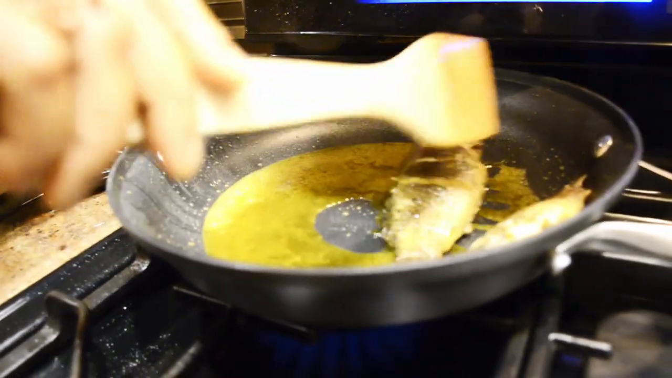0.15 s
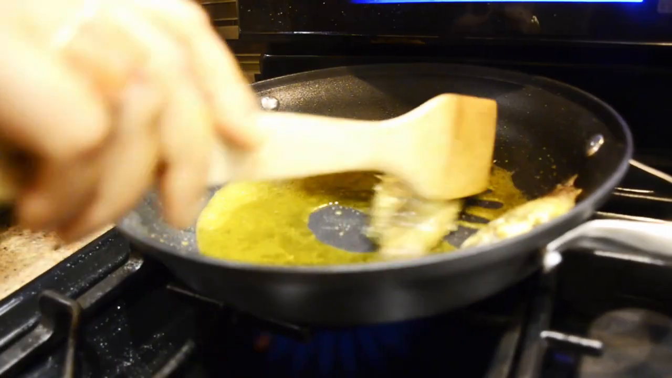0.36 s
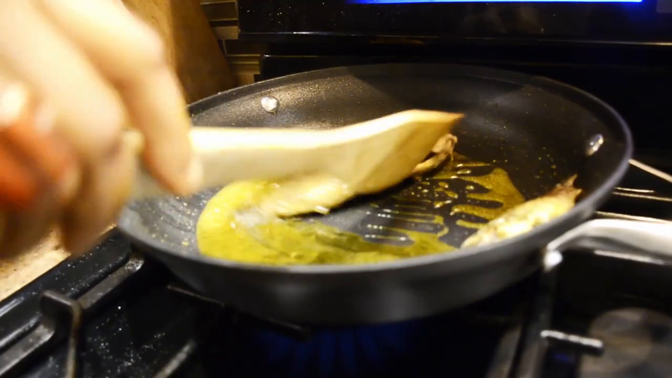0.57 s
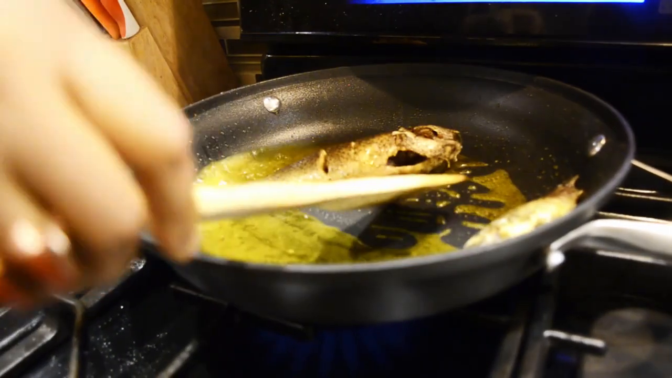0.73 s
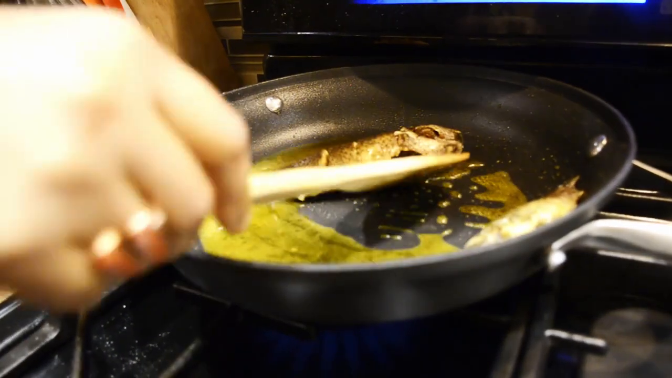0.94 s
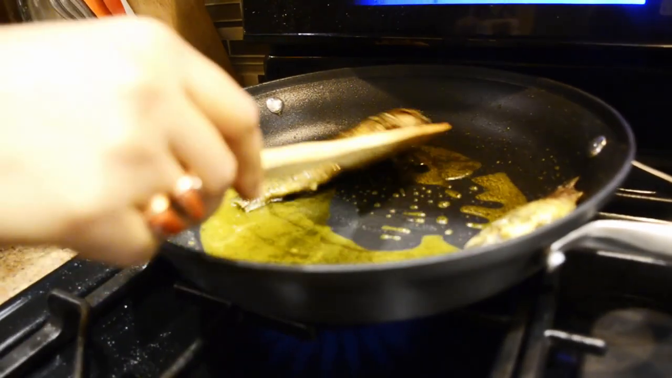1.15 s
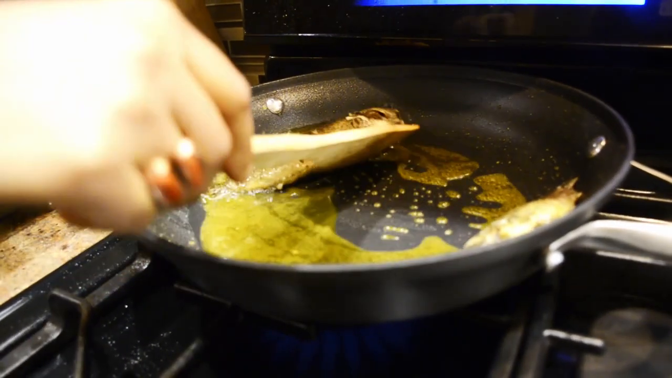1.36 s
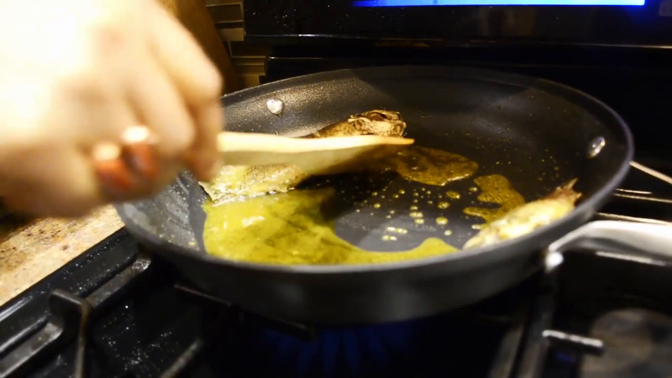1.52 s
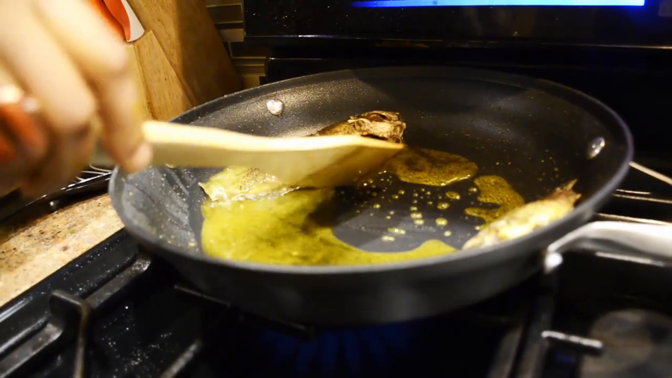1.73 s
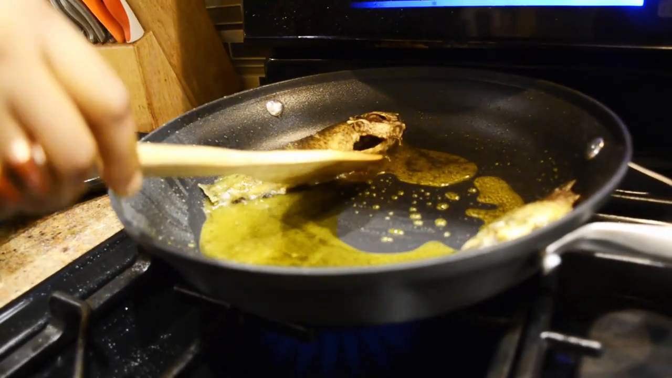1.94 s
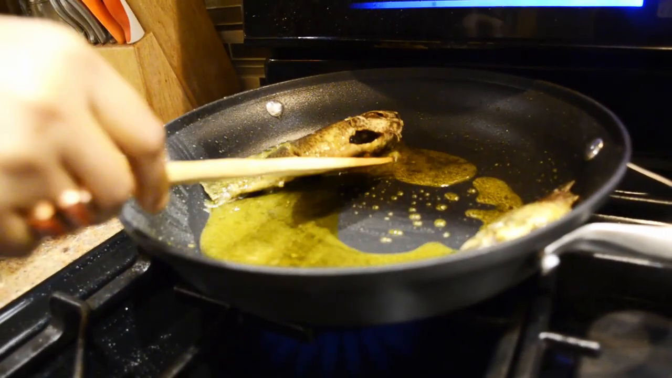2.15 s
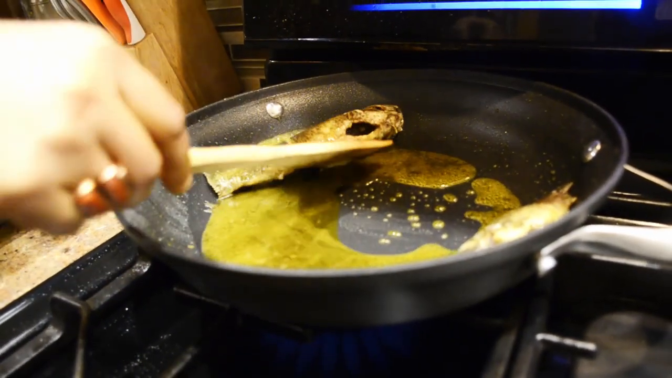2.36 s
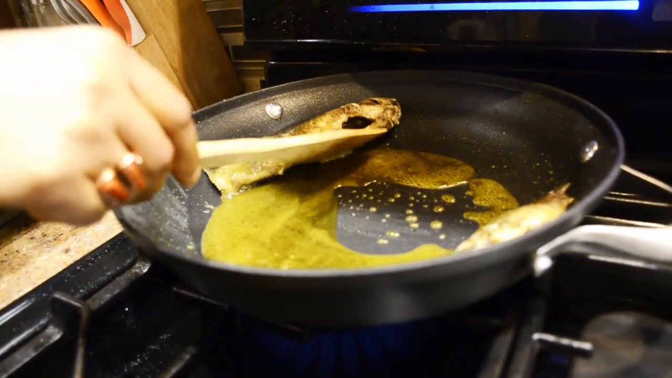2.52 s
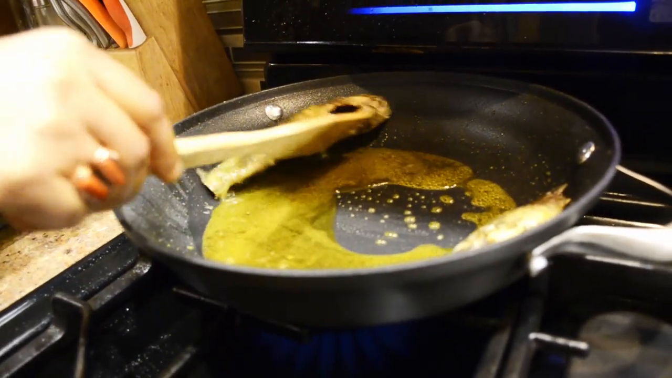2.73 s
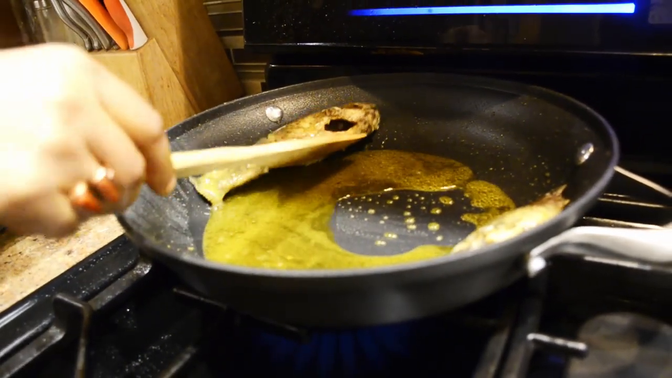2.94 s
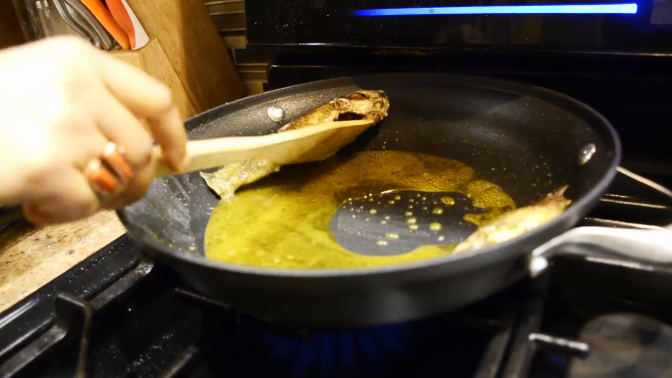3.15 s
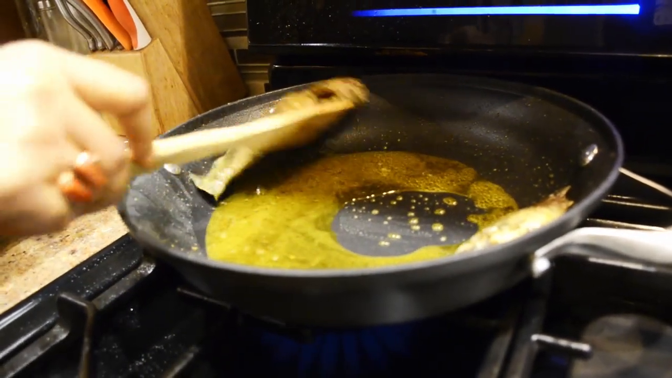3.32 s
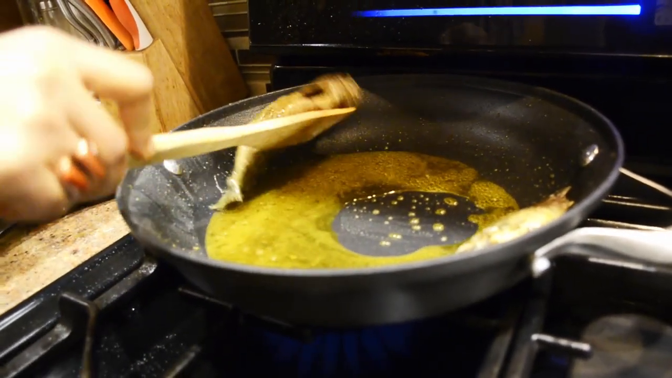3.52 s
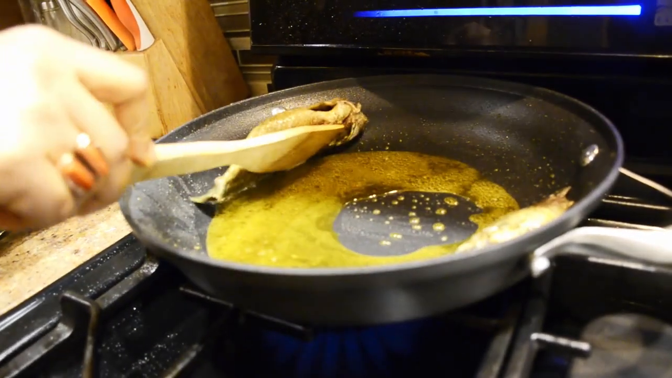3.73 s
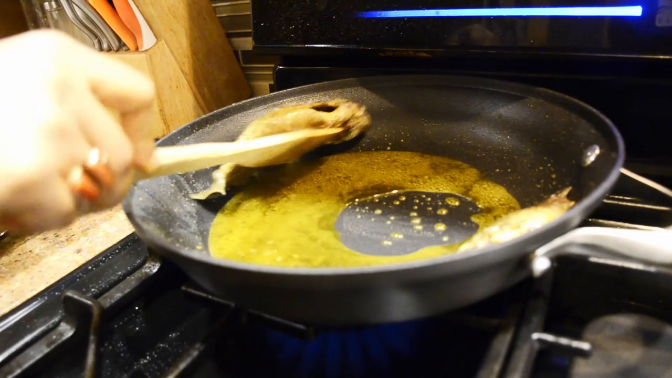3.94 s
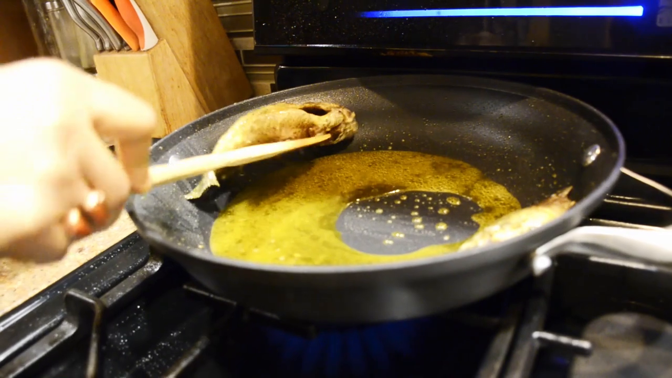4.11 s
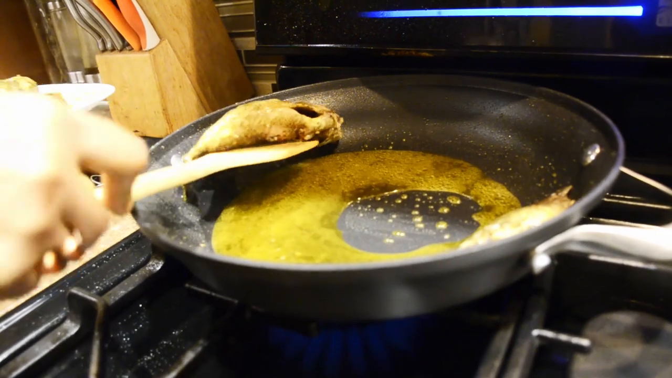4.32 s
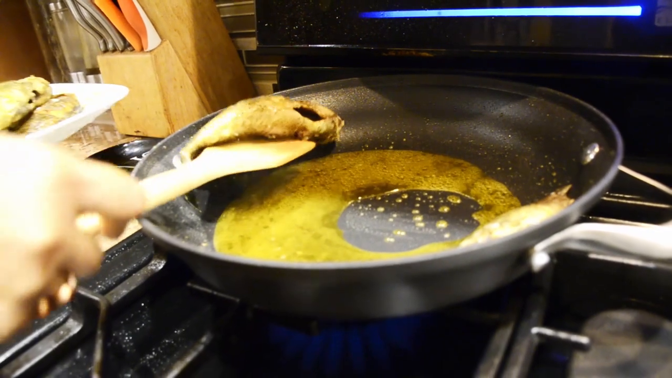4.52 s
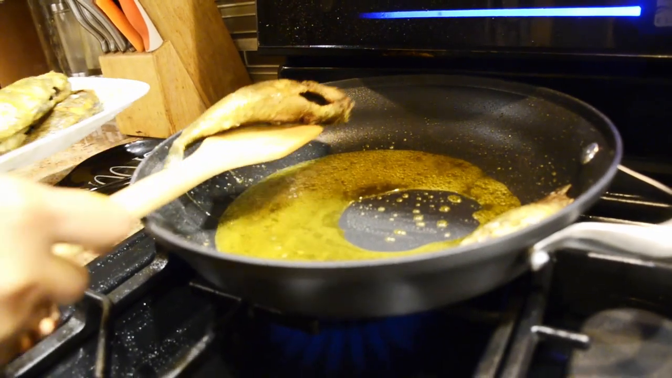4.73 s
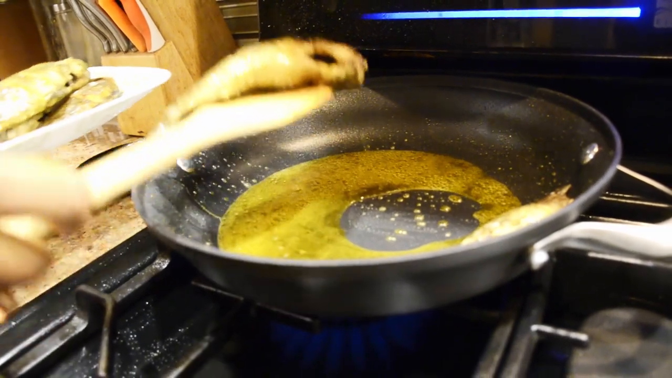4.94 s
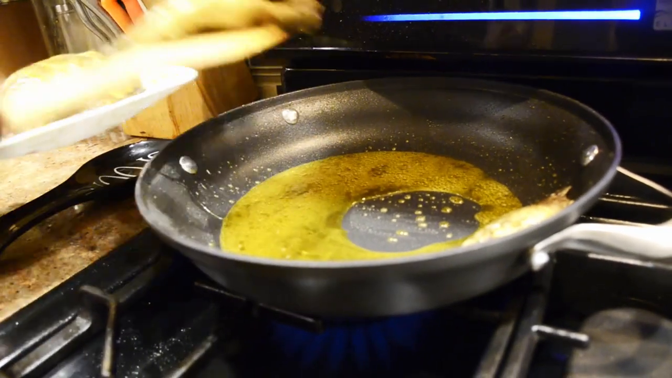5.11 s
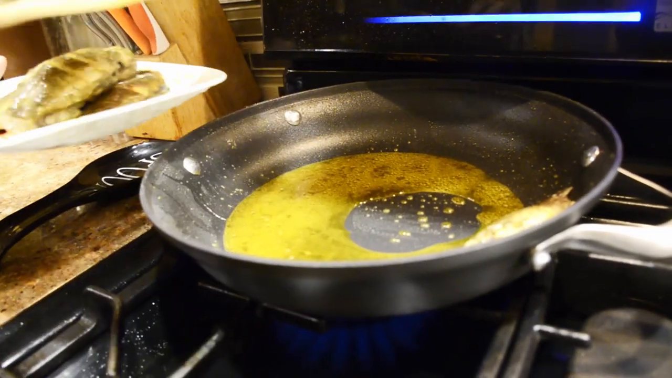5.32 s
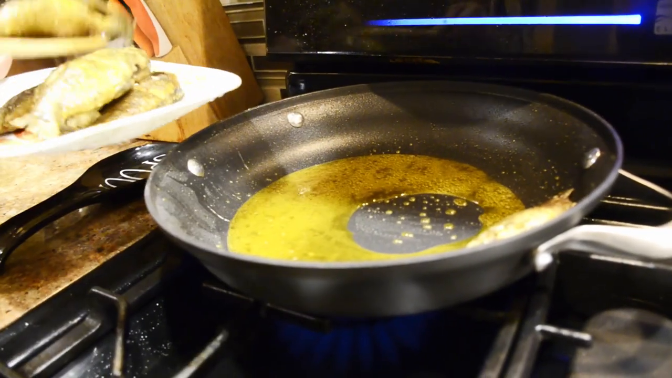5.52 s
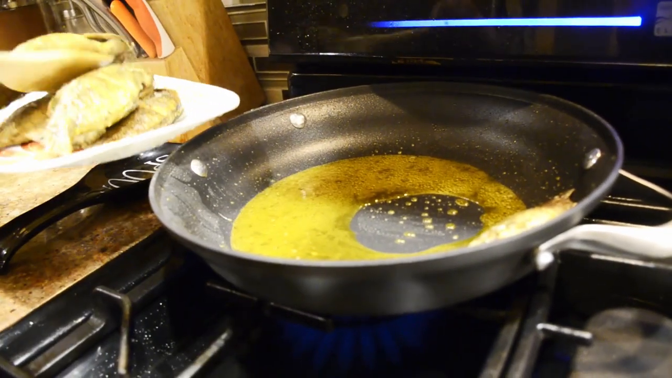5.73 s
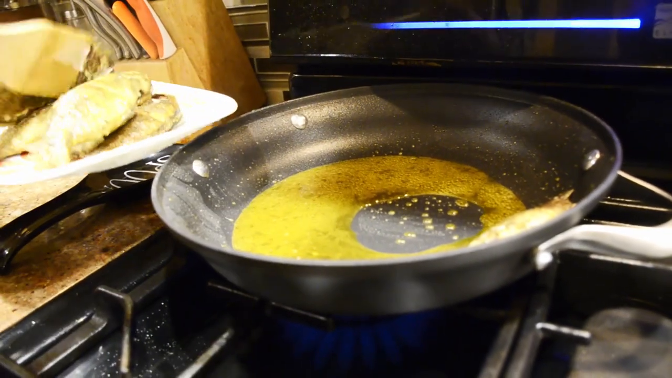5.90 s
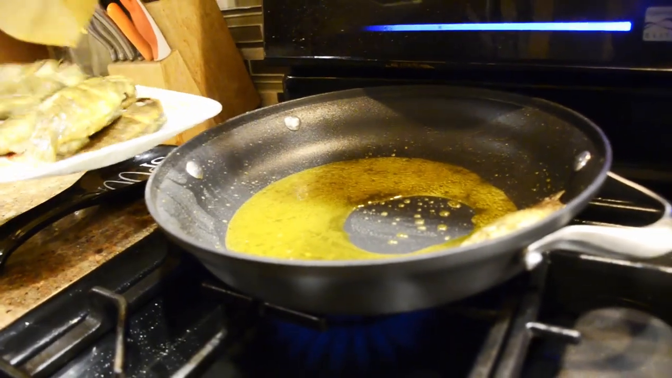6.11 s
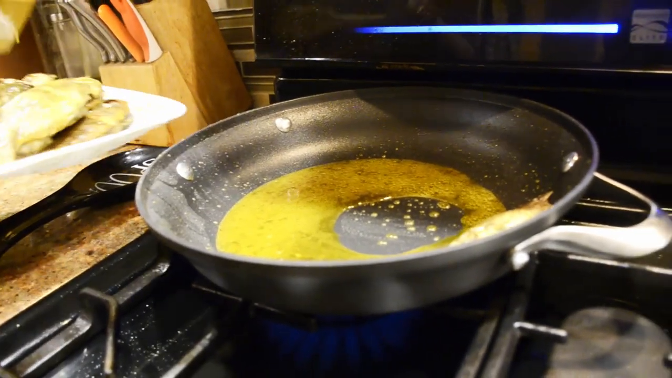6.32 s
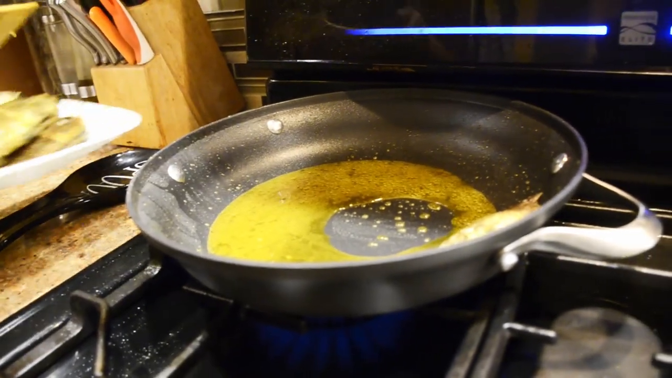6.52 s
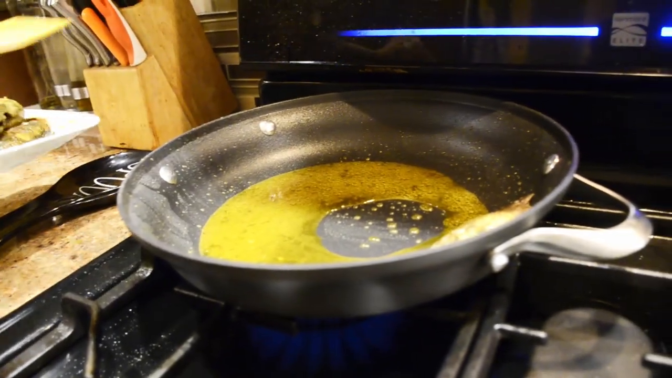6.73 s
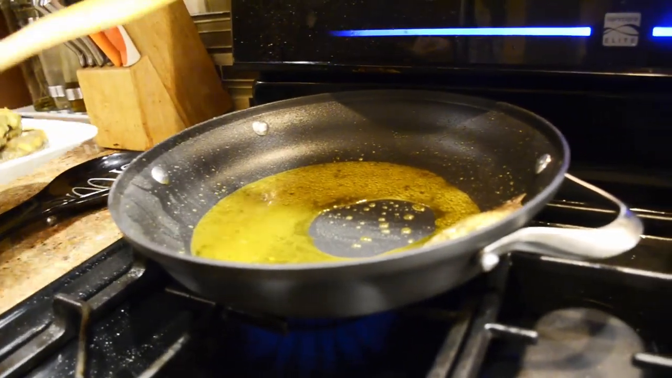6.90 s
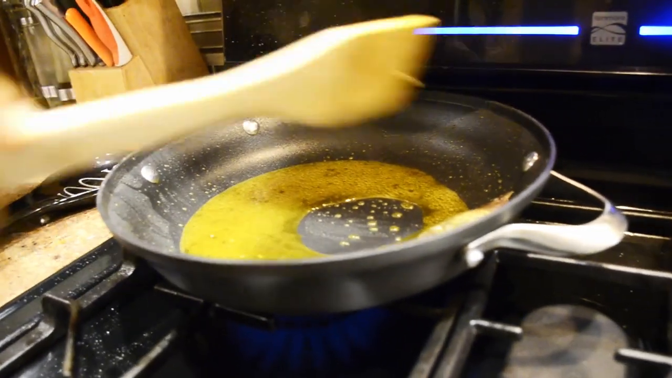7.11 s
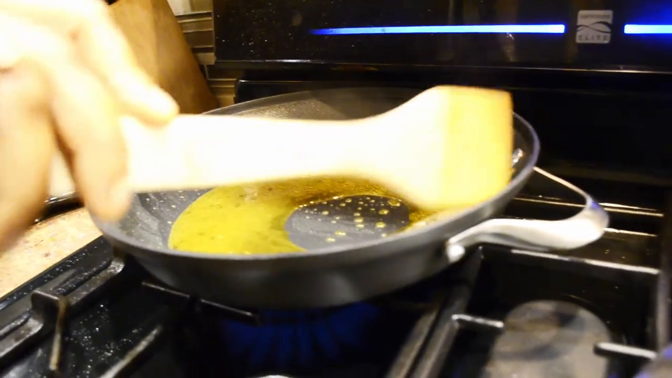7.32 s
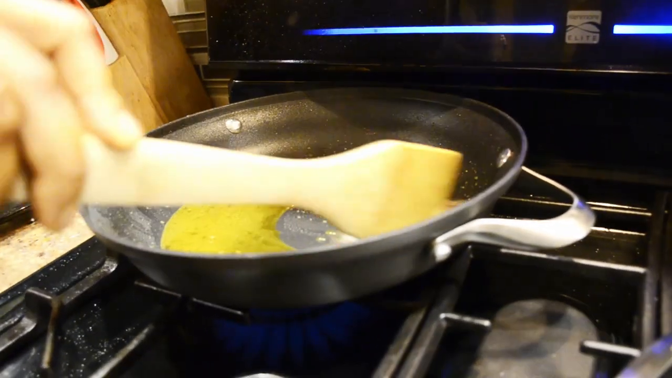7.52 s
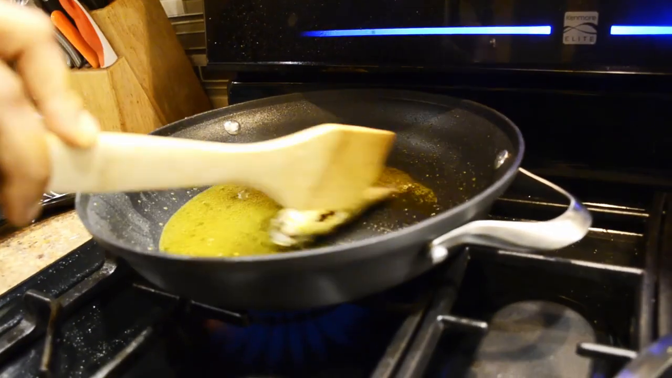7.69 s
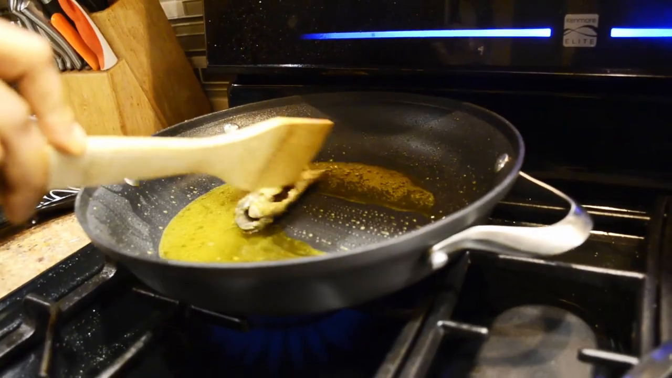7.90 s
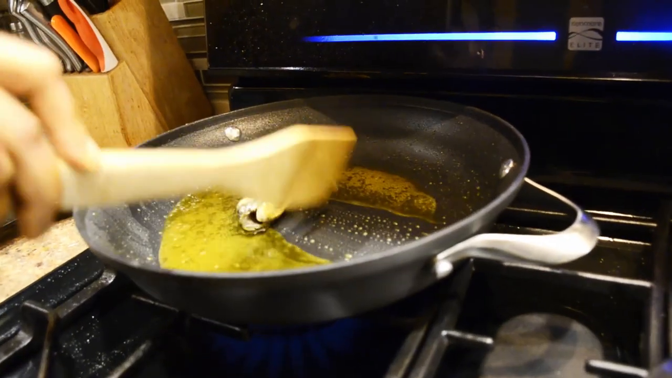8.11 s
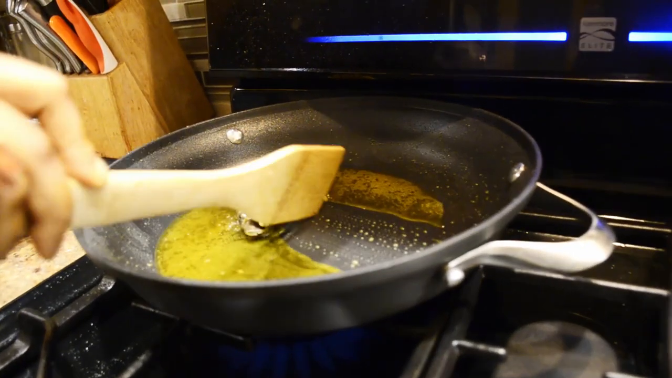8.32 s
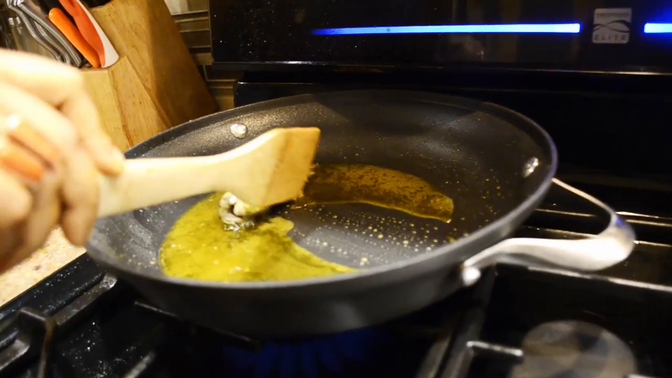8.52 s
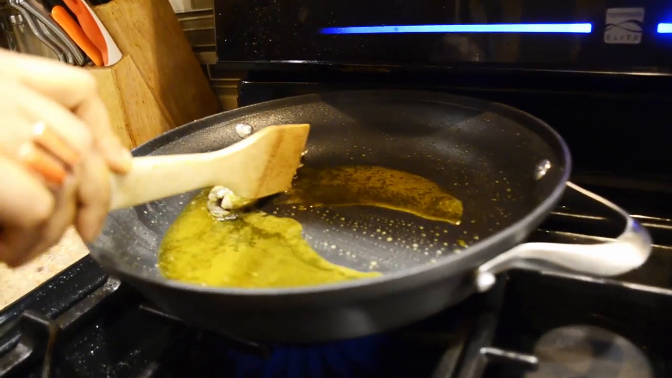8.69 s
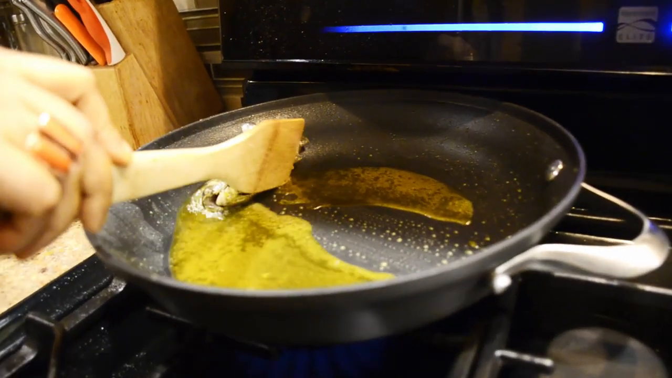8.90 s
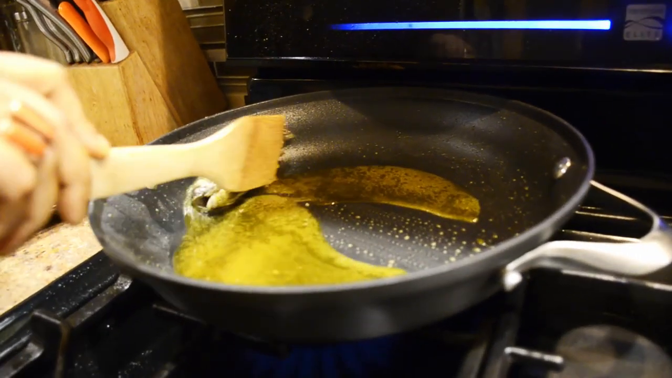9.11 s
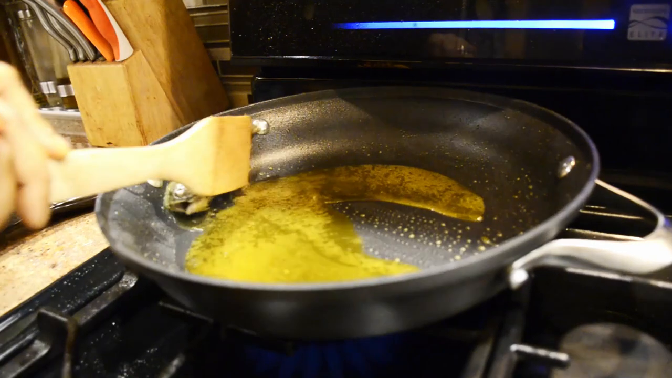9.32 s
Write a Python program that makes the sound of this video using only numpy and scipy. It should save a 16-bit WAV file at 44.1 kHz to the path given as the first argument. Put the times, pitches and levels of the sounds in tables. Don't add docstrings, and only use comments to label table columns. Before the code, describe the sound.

Close, crackling fish fry: dense sizzle and sharp pops, a few light wood-on-pan taps, fading to quiet ticks, then rising sizzle.

```python
import sys
import numpy as np
from scipy import signal
from scipy.fft import rfft, irfft
from scipy.io import wavfile
from scipy.ndimage import uniform_filter1d

SR = 44100
rng = np.random.default_rng(int(sys.argv[2]) if len(sys.argv) > 2 else 0)


def attenuation_scalar(level_db):
    decades = np.asarray(level_db, float) / 20
    return 10 ** decades


def dump_mix(stems):
    frames = np.atleast_2d(stems).T
    limited = np.clip(frames, -1, 1)
    pcm = np.round(limited * 32767).astype(np.int16)
    wavfile.write(sys.argv[1], SR, pcm)


N = 412335

# pitch in Hz, width in Hz, boost in dB.
PAN_HOLLOW_PEAKS = [(1650, 236, 9), (2084, 380, 4), (1130, 320, 4), (892, 55, 6), (679, 15, 9.5),
                    (5350, 11000, 3)]


def rms_one(x):
    return x / np.sqrt(np.mean(x ** 2) + 1e-20)


def full(coarse):
    return np.interp(np.arange(N) / 20, np.arange(len(coarse)), coarse)


def at_hz(points, hz):
    point_hz, point_db = np.transpose(points)
    return np.interp(np.log(hz), np.log(point_hz), point_db)


def drift(rate):
    r = np.exp(-40 * np.pi * rate / SR)
    noise = rng.standard_normal(N // 20 + 2002)
    return rms_one(signal.lfilter([1], [1, -2 * r, r * r], noise)[2000:])


def bubble(x, hz, sharp):
    edge = 1 + .5 / sharp
    band = [hz / edge, min(hz * edge, .45 * SR)]
    return signal.sosfilt(signal.butter(2, band, "band", fs=SR, output="sos"), x + 1e-18)


def splutter(noise, hz, sharp, length_s):
    t = np.arange(len(noise)) / SR / length_s
    snap = 1.0 * (t == 0)
    envelope = np.exp(-t ** 0.93) * np.minimum(0.4 + 2 * t, 1)
    burst = bubble((noise * np.abs(noise) + snap) * envelope, hz, sharp)
    return burst / np.abs(burst).max()


def ring(hits, hz, t60):
    r, w = attenuation_scalar(-60 / (t60 * SR)), 2 * np.pi * hz / SR
    return signal.lfilter([0, np.sin(w)], [1, -2 * r * np.cos(w), r * r], hits + 1e-18)


def bells(x, table):
    for hz, width, db in table:
        cos, g, a = np.cos(2 * np.pi * hz / SR), attenuation_scalar(db / 2), np.tan(np.pi * width / SR)
        x = signal.lfilter([1 + a * g, -2 * cos, 1 - a * g], [1 + a / g, -2 * cos, 1 - a / g], x)
    return x


def clicks(per_s, spread_db):
    sizes = attenuation_scalar(spread_db * np.minimum(rng.exponential(1, N), 3.0)) * rng.choice([-1, 1], N)
    rate = full(per_s)
    return rms_one(sizes * (rng.random(N) < rate / SR) / rate ** 0.15)


def sizzle():
    # time in seconds, vigour in dB,
    # commonest bubble pitch in octaves over middle_hz, brightness in dB per octave.
    oil_states = [(0, -20.5, -0.23, 1.5), (.45, -24, 0.29, 0.5), (.72, -20, -0.16, -1.6),
                  (1.02, -23.5, 0.45, -0.5), (1.25, -18.5, 0.29, -0.5), (2.3, -18.5, 0.35, -2),
                  (3.1, -19.5, -0.59, 0.5), (4.3, -19.5, -0.49, 0.6), (4.749, -25, -0.42, 1.1),
                  (5.9, -27.5, -0.51, 2.5), (6.6, -33, -0.66, 1.9), (7.1, -34, -0.61, 1.2),
                  (7.501, -34, 1, -1.5), (7.9, -25, 0.73, -1), (8.4, -25.5, 0.77, -1.7),
                  (8.55, -21, 0.46, 0.5), (9.1, -16.5, -0.21, 1), (9.35, -17, 0.23, 1)]
    # pitch in Hz, level in dB per Hz.
    colour = [(140, -29), (250, -23), (500, -10.5), (900, -10), (1300, -6.5), (1700, -9), (2500, -3),
              (3500, -3), (5000, 1.5), (7500, 3), (9000, -4), (11000, -47), (13500, -10), (15500, -72)]
    # time in seconds, length in seconds, boost in dB, pitch in Hz.
    flurries = [(0.205, 0.018, 14, 2140), (0.303, 0.053, 8, 2550), (0.385, 0.041, 10, 2340),
                (0.44, 0.012, 16.5, 2270), (0.748, .1, 9, 5600), (1.296, 0.0097, 18, 1800),
                (1.335, .014, 6, 2000), (3.425, 0.027, 6.5, 9000), (4.397, 0.097, 5, 2860),
                (2.475, 0.065, 5, 3160), (7.763, .03, 12, 1830), (5.74, 0.034, 9, 2980),
                (7.356, 0.064, 14, 2590), (8.008, 0.027, 5, 4000), (8.188, 0.013, 14, 4130),
                (8.33, 0.03, 6, 4450)]
    # time in seconds, length in seconds, loss in dB.
    lulls = [
        (3.197, 0.078, -2.5),
        (7.89, 0.045, -4.5),
        (8.065, 0.014, -4.5),
        (8.157, 0.012, -2),
        (8.276, 0.013, -3),
        (8.406, .014, -8),
    ]
    level_db, middle_hz = -18, 3500
    large_extra_swing, large_below_hz = 0.86, 440
    common_db, common_octaves = 6, 0.74
    flurry_octaves = 0.47
    hiss_follows = .3
    dry_crack_db, dry_crack_follows = -12, 0.66

    s, vigour, common_size, bright = np.transpose(oil_states)
    t = np.arange(N // 20 + 2) * 20 / SR
    vigour = np.interp(t, s, vigour - vigour.mean())
    common_size, bright = np.interp(t, s, common_size), np.interp(t, s, bright)
    for at, length, loss_db in lulls:
        vigour = vigour + loss_db * np.exp(-((t - at) / length) ** 2)
    clump = drift(14) + .8 * drift(60)
    busy_db = .5 * vigour
    bursts = clicks(7000 * attenuation_scalar(busy_db + 2.2 * clump), spread_db=2.0)
    cracks = clicks(450 * attenuation_scalar(busy_db + 3.0 * clump), spread_db=4.5)
    dealt = rng.integers(0, 40, N)
    fine = rng.standard_normal(N) * full(attenuation_scalar(0.54 * clump + hiss_follows * vigour))

    out = np.zeros(N)
    for k, hz in enumerate(np.geomspace(150, 15500, 40)):
        if k % 3 == 0:
            near = drift(71.0)
        own = bursts * (dealt == k) * np.sqrt(40)
        own = own + fine * (0.27 + hz / 9000)
        tone = rms_one(bubble(own + .5 * (-1) ** k * cracks, hz, sharp=5))
        swing = 1 + large_extra_swing / (1 + (hz / large_below_hz) ** 4)
        octaves = np.log2(hz / middle_hz)
        common = common_db * np.exp(-((octaves - common_size) / common_octaves) ** 2)
        for at, length, boost_db, flurry_hz in flurries:
            apart = np.log2(hz / flurry_hz) / flurry_octaves
            common = common + boost_db * np.exp(-((t - at) / length) ** 2 - apart ** 2)
        db = at_hz(colour, hz) + swing * vigour + bright * np.clip(octaves, -2, 2)
        db = db + common + 1.76 * near
        out += tone * full(np.sqrt(hz) * attenuation_scalar(db))

    dry_cracks = rms_one(bubble(cracks * np.sqrt(np.abs(cracks)), 2860, sharp=0.48))
    dry_cracks = dry_cracks * full(attenuation_scalar(dry_crack_db + dry_crack_follows * vigour))
    return attenuation_scalar(level_db - 1.5) * rms_one(bells(rms_one(out) + dry_cracks, PAN_HOLLOW_PEAKS))


def pops():
    # time in seconds, peak in dB, pitch in Hz, length in ms.
    plops = [(0.2207, -3, 2150, 4.2), (0.502, -3.5, 2100, 3.2), (1.0355, -8.5, 2000, 3.5),
             (2.1151, 0.5, 2700, 1.7), (2.5905, 1, 2010, 1.9), (2.7853, -12.5, 1690, 1.8),
             (3.2145, -1, 2760, 3.3), (3.3128, -0.5, 1650, 4), (3.6162, -6, 2270, 1.5),
             (3.8217, -4.5, 1870, 2.5), (4.4019, -14, 1600, 2.4), (4.509, -11, 1750, 2.4),
             (4.5827, -1.5, 2560, 2.9), (4.6535, -3.5, 2180, 2.9), (4.853, -6, 2350, 1.5),
             (5.0185, -11, 2220, 2.1), (5.036, -5.5, 1780, 2.3), (5.1977, -5, 1860, 2.4),
             (5.2756, -21, 2690, 4), (5.3396, -6.5, 2240, 2.1), (5.5119, -12, 2670, 2.3),
             (5.5264, -7.5, 1820, 2.9), (6.2163, -11, 1960, 2.6), (6.2926, -14, 2060, 4.1),
             (6.6129, -13.5, 2800, 3.8), (6.6348, -17, 1940, 1.6), (6.6558, -10.5, 1650, 2.2),
             (6.8049, -10.5, 1820, 5.7), (6.8767, -9, 2430, 2.5), (8.3767, -5, 2850, 3.5)]
    # time in seconds, peak in dB, pitch in Hz, length in ms.
    snaps = [(0.5794, -1.5, 4430, 2.4), (1.7674, -5, 4420, 2.5), (1.848, -1.5, 3200, 3),
             (1.8697, -2, 4400, 0.85), (2.137, -8, 3500, 1.9), (2.2123, 0.5, 4160, 3.2),
             (2.3161, -0.5, 3500, 2.4), (2.3867, 0, 3820, 1.9), (2.9138, -2.5, 4330, 2.7),
             (3.9578, -3, 4300, 3.9), (4.115, -15, 4050, 2.2), (4.239, -6, 3430, 2.9),
             (4.3906, -3, 3060, 2.1), (4.4375, -3, 3100, 1.9), (4.7775, -15, 3100, 1.6),
             (5.0993, -9, 4130, 2.1), (5.6414, -9, 3580, 1.6), (5.6995, -8, 4400, 1.7),
             (6.2112, -17, 4460, 1.6), (6.2914, -11, 2900, 2.6), (6.534, -7, 5430, 2.5),
             (6.6344, -14, 4660, 2.4), (7.0469, -11.5, 3740, 3), (7.1092, -11.5, 5200, 3.1),
             (7.813, -11, 4600, 2.4), (8.081, -7, 4000, 5), (8.1723, -24, 4140, 2.6),
             (8.2306, -7.5, 4660, 2.5), (8.2891, -5, 4730, 3.5), (3.227, -7, 2740, 2.4)]
    # time in seconds, peak in dB, pitch in Hz, length in ms.
    spits = [(0.5771, 0, 6340, 3), (0.631, -3, 7460, 2.9), (7.279, -13, 4470, 5), (1.332, -5, 7610, 2.6),
             (1.4055, -3.5, 8080, 2.2), (1.4296, -4, 6520, 2), (1.482, -17, 6660, 2.2),
             (1.514, -6, 6760, 2.5), (2.2253, -0.5, 6650, 2.5), (7.317, -16, 6950, 4),
             (7.8326, -8, 4750, 3), (2.801, -6, 7000, 2.2), (3.253, -6, 7300, 1), (3.4574, -9, 8400, 2.8),
             (3.725, -5, 8150, 2.2), (3.9285, -1.5, 7400, 2.1), (4.7666, -19, 8800, 2.9),
             (5.6998, -8, 6550, 2.6), (6.211, -3, 8100, 1.5), (6.2756, -10.5, 6410, 1.9),
             (6.4324, -15, 7740, 2.5), (6.5795, -12, 8150, 3.2), (6.6338, -7.5, 6400, 2),
             (6.6673, -12, 7950, 4.2), (7.1092, -22, 6360, 2.8), (7.9753, -3, 7440, 2),
             (8.5053, -4, 7840, 1.8), (8.5325, -5, 6450, 2.2), (8.683, -12, 7540, 2.8),
             (8.4806, -6, 4800, 3.6)]
    # time in seconds, peak in dB, pitch in Hz.
    ticks = [(0.3684, -7, 2500), (1.1724, -5, 7040), (2.8584, -6, 2770), (4.0761, -10, 1770),
             (4.8239, -7.5, 2870), (3.334, -12, 1700), (5.3544, -27, 1600), (5.3827, -11.5, 2080),
             (5.4044, -11, 4000), (5.5603, -12.5, 2140), (5.6765, -20, 2220), (5.7234, -16.5, 1640),
             (5.8077, -12, 5000), (5.9908, -37, 2840), (6.0501, -23, 2100), (6.1399, -14, 3170),
             (6.1804, -20, 1870), (6.3094, -23, 3000), (6.3824, -16, 2880), (6.4607, -15, 4910),
             (6.5111, -15, 3680), (6.6977, -22, 2560), (6.9252, -17, 4840), (7.2364, -21, 4690),
             (7.3632, -16, 4140), (7.3954, -14.5, 4140), (7.5323, -16, 4670), (8.0137, -10, 3150),
             (8.1858, -13, 4800), (8.3414, -10, 3330)]
    ticks = [(*row, 4.7) for row in ticks]
    # its rows, gain in dB, then spray and broad snap in dB against the peak
    kinds = [(plops, 0.5, -9, -6), (snaps, 3.5, -6.5, -19), (spits, 3.5, -4, -12), (ticks, 1, 2, 3)]
    out = np.zeros(N + 2048)
    for rows, gain_db, spray_db, snap_db in kinds:
        for s, db, hz, ms in rows:
            noise = rng.standard_normal((3, 1024))
            length = max(ms, .2) * 0.00096
            body = splutter(noise[0], hz, 4.0, length)
            snap = attenuation_scalar(snap_db) * splutter(noise[1], hz * 1.2, .5, length * .12)
            spray = attenuation_scalar(spray_db) * splutter(noise[2], 8000, 1.0, length * 1.2)
            out[round(s * SR) + 10:][:1024] += attenuation_scalar(db + gain_db - 9.0) * (body + snap + spray)
    duller = signal.butter(4, 9500, fs=SR, output="sos")
    return bells(signal.sosfilt(duller, out[:N]), PAN_HOLLOW_PEAKS)


def needles():
    # time in seconds, peak in dB, pitch in Hz.
    skin_bursts = [(0.0246, 0, 3880), (0.3694, -6, 3400), (0.5808, -4, 5200), (0.632, -4, 6100), (0.6741, 0, 4800),
                   (0.7483, 0, 3900), (0.8652, -2, 5800), (0.8817, -7, 5400), (1.0168, -6, 4100),
                   (1.1297, -16, 6700), (1.1621, -5, 4400), (1.1738, -5, 3000), (1.2535, -3, 2300),
                   (1.3549, 1, 2400), (1.4615, -6, 5600), (1.5154, 4, 5200), (1.6047, -3, 4670),
                   (1.6404, -12, 4600), (1.768, -11, 4200), (1.848, 1, 3520), (1.9147, 5, 3950), (2.0213, 1, 2680),
                   (2.0709, -0.5, 1990), (2.1162, -9, 2800), (2.1672, 0, 2730), (2.1808, 6, 3750),
                   (2.2142, -2, 4200), (2.2381, 3, 5300), (2.2713, -2, 4500), (2.2918, -1, 2500),
                   (2.3175, -34, 3150), (2.6339, 1.5, 2580), (2.6768, -12, 2740), (2.7316, -13, 3030),
                   (2.8595, -9, 3500), (2.865, -4, 3800), (2.8954, -5, 3150), (2.9151, -7, 4100),
                   (2.9546, -18, 3400), (2.9875, 1, 5100), (3.0186, -4, 3200), (3.0498, -1, 3100),
                   (3.1391, -28, 4400), (3.1983, -8, 4170), (3.216, 0, 2600), (3.2532, -2, 4120),
                   (3.2876, -12, 5250), (3.3163, 0, 1900), (3.4579, 8.5, 7100), (3.4863, -21, 3970),
                   (3.6173, 2, 2170), (3.6726, -2, 3800), (3.7262, -8, 7160), (3.8136, 4, 6000),
                   (3.9628, 3.5, 2860), (4.078, -15, 2720), (4.1158, 1, 3300), (4.1927, 0.5, 2980),
                   (4.2394, 2, 3300),
                   (4.2898, 0, 3600), (4.3414, -5, 3500), (4.4035, -2, 2340), (4.4257, 2, 2900),
              (4.439, -2, 2800), (4.4621, 1, 5800), (4.4977, -2, 3100), (4.5099, -15, 2030),
              (4.5422, 1, 3000), (4.5834, -5, 2400), (4.5926, -15, 4100), (4.6542, -3, 2110),
              (4.7678, -9, 7350), (4.7784, -6, 3000), (4.787, -4, 3300), (4.8038, -7, 3470),
              (5.0327, -8, 3320), (5.0398, -11, 1700), (5.1, -7, 3400), (5.1066, -5, 7000),
              (5.1841, -1.5, 3340), (5.1985, -24, 1900), (5.2689, -4, 5400), (5.2773, -0.5, 2870),
              (5.3565, -6, 3600), (5.3652, -6, 4300), (5.3841, -6, 2820), (5.4249, -5, 5400),
              (5.4416, -9, 6300), (5.5132, -16, 2500), (5.5192, -3, 4200), (5.6158, -12, 5700),
              (5.6429, -16, 3430), (5.6645, -6, 5200), (5.7002, 0, 5430), (5.7245, -3, 4000),
              (5.788, -13, 5800), (5.809, -5, 3600), (5.8614, -43, 4100), (5.974, -10, 3300),
              (5.992, -13, 2800), (6.0516, -13, 4900), (6.077, -9, 5000), (6.1411, -16, 2900),
              (6.1813, -5, 4200),
                   (6.2121, 0, 6700), (6.267, -14, 2600), (6.2768, -18, 7100), (6.292, -8, 3200),
            (6.2993, -7, 3300), (6.3837, -16, 2800), (6.4316, -3.5, 5100), (6.47, -13, 5000),
            (6.5124, -13, 4300), (6.5365, -19, 5200), (6.5812, -14, 7700), (6.6146, -9, 2600),
            (6.6265, -7, 6800), (6.635, -2.5, 3800), (6.658, -26, 1600), (6.6675, -8, 5300),
            (6.6996, -10, 2400), (6.8104, -14, 2030), (6.8766, -7, 2420), (6.9263, -8, 6500),
            (6.9532, -14, 2900), (7.0483, -11, 3900), (7.111, -13, 5200), (7.1807, -14, 3500),
            (7.2368, -12, 5000), (7.5234, -20, 4500), (7.5336, -16, 5600), (7.5483, -14, 3400),
            (7.63, -20, 2700), (7.647, -17, 5530), (7.674, -11, 4800), (7.9761, -5, 5700),
            (7.9893, 0, 4700), (8.0156, 0.5, 3240), (8.2918, -6, 4600), (8.3776, -1, 2800),
            (8.4626, 0, 4900), (8.5067, 4, 6260), (8.5337, -3, 6100), (8.6844, 4, 7400),
            (8.7124, 3.5, 3900), (8.9619, -6, 5300), (9.1047, 4, 4300), (9.121, 0, 3800),
            (9.1418, -9, 6000), (9.3125, -1, 4900)]
    # delay in ms, level in dB.
    wall_echoes = [(1.4, -17), (2.9, -11)]
    level_db, cycles, above_hz = -1.0, .6, 900
    rows = skin_bursts
    out, t = np.zeros(N + 512), np.arange(-64, 448) / SR
    chance = rng.standard_normal((len(rows), 512))
    fizzes = rms_one(bubble(chance, 4500, sharp=.8)) * (t > 0) * attenuation_scalar(-17.0 - 60 * t / .02)
    for (s, db, hz), noise, fizz in zip(rows, chance, fizzes):
        wave = np.cos(2 * np.pi * hz * t + .6 * noise[1])
        pulse = np.sign(noise[0]) * np.exp(-(t * hz / cycles) ** 2) * wave
        echoes = sum(attenuation_scalar(loss_db) * np.roll(pulse, round(ms * SR / 1000)) for ms, loss_db in wall_echoes)
        out[round(s * SR) - 64:][:512] += attenuation_scalar(db + level_db) * (pulse + echoes + fizz)
    return signal.sosfilt(signal.butter(2, above_hz, "high", fs=SR, output="sos"), out[:N])


def spatula():
    # time in seconds, peak in dB, wood pitch in Hz, pan ring in dB against the peak.
    taps = [(.492, -25, 800, -18), (.80, -25, 690, -12), (1.21, -20, 900, -12), (1.228, -9, 1350, -20),
            (1.236, -7, 1700, -20), (1.238, -18, 640, -15), (1.25, -7, 1600, -20), (1.254, -16, 720, -15),
            (1.288, -18, 520, -16), (1.296, -5, 1500, -22), (1.342, -7, 2050, -20), (1.354, -6, 1500, -22),
            (1.355, -18, 600, -14), (1.83, -24, 700, -6), (2.02, -20, 700, -14), (2.045, -22, 600, -18),
            (2.068, -24, 420, -18), (2.165, -16, 1200, -12), (3.314, -12, 1650, -24), (3.58, -24, 600, -10),
            (5.275, -20, 1200, -22), (5.722, -26, 800, -20), (7.279, -23, 570, -1), (7.287, -18, 1720, -12),
            (7.326, -30, 2000, -1)]
    # pitch in Hz, level in dB, seconds to fade by 60 dB.
    pan_tones = [(450, -10, .3), (690, -11, .12), (885, -6, .2), (964, -3, .25), (1140, -12, .2),
                 (1292, -14, .1), (1640, -4, .33), (1755, -3, .12), (2000, -5, .09), (2700, -18, .06)]
    # time in seconds, peak in dB, pitch in Hz, seconds to fade by 60 dB.
    bumps = [(.93, -36, 41, 0.036), (1.225, -56, 147, 0.41), (1.3, -36, 168, 0.16), (1.355, -24, 119, 0.12),
             (1.43, -26, 94, 0.062), (1.7, -42, 40, 0.14), (2.066, -24, 263, 0.17), (2.695, -30, 111, 0.15),
             (3.47, -47, 40.4, 0.11), (3.6, -66, 59.7, 0.19), (7.29, -32.5, 151, 0.17)]
    seconds, tap_db, wood_hz, ring_db = np.transpose(taps)
    at = np.round(seconds * SR).astype(int)
    out = np.zeros(N + 2048)
    for i, db, hz in zip(at, tap_db, wood_hz):
        out[i:i + 2048] += attenuation_scalar(db) * splutter(rng.standard_normal(2048), hz, 2.4, length_s=.005)
    out = out[:N]
    strength = rng.normal(0, 2, (len(taps), len(pan_tones)))
    for k, (hz, mode_db, t60) in enumerate(pan_tones):
        blows = np.zeros(N)
        blows[at] += attenuation_scalar(tap_db + ring_db + mode_db - 1.0 + strength[:, k])
        out += ring(blows, hz, t60) * (-1) ** k
    out = signal.sosfilt(signal.butter(2, 250, "high", fs=SR, output="sos"), out)
    t = np.arange(SR // 2) / SR
    for s, db, hz, t60 in bumps:
        swell = 1 - np.exp(-t / 0.012)
        out[round(s * SR):][:len(t)] += attenuation_scalar(db - 60 * t / t60) * swell * np.sin(2 * np.pi * hz * t)
    return out


def flame_and_hood():
    # pitch in Hz, level in dB per Hz.
    hum_colour = [(15, -40), (30, -15), (60, -9), (81, 1.5), (98, -7), (130, 3.5), (195, -5.5), (264, 0.5),
                  (430, 1.5), (690, 3), (900, 3), (1400, -16.5), (2500, -33)]
    hz = np.maximum(np.fft.rfftfreq(N, 1 / SR), 1)
    noise = rfft(rng.standard_normal(N))
    return attenuation_scalar(-50) * rms_one(irfft(noise * attenuation_scalar(at_hz(hum_colour, hz)), N))


def kitchen(x):
    t60_s, wall_cut_hz = .26, 6000
    t = np.arange(SR // 2) / SR
    noise = rng.standard_normal(len(t)) * (t > .004)
    dull = signal.sosfilt(signal.butter(1, wall_cut_hz, fs=SR, output="sos"), noise)
    tail = dull * attenuation_scalar(-60 * t / t60_s) + (noise - dull) * attenuation_scalar(-120 * t / t60_s)
    wet = signal.fftconvolve(x, tail / np.sqrt(np.sum(tail ** 2)))[:N]
    moved = np.arange(N) + 12 * full(drift(2))
    return np.interp(moved, np.arange(N), wet)


def scene():
    pan = sizzle() + pops() + spatula() + needles()
    return (pan + attenuation_scalar(-10.0) * kitchen(pan) + flame_and_hood())[None]


def starve(x):
    # time in seconds, loss in dB.
    thin_moments = [(.075, -15), (.14, -12), (.844, -15), (1.378, -10), (1.975, -16), (2.698, -16),
                    (2.762, -11), (3.091, -28), (3.533, -16), (3.787, -10), (3.872, -10), (4.644, -18),
                    (4.939, -14), (5.916, -28), (7.202, -19), (7.765, -25), (8.14, -14)]
    t, loss_db = np.arange(N // 20 + 2) * 20 / SR, 0
    for s, db in thin_moments:
        loss_db = loss_db + db * np.exp(-((t - s) / .014) ** 4)
    kept = full(attenuation_scalar(loss_db))
    hz, whole = np.fft.rfftfreq(N, 1 / SR), rfft(x)
    weak = irfft(whole * ((hz < 1000) | (hz > 9800)), N)
    top = irfft(whole * (hz > 14900), N)
    dropped = np.repeat(rng.random(N // 1024 + 1) < .3, 1024)[:N]
    flicker = uniform_filter1d(1. * dropped, size=300)
    gap_bands = rng.random(SR // 600) < .4
    gaps = gap_bands[(hz // 340).astype(int)] * (hz > 1000) * (hz < 9800)
    lost_in_gaps = irfft(whole * gaps, N) * (1 - np.sqrt(kept))
    return x - weak * (1 - kept) - lost_in_gaps - top * kept * flicker


def roll_off(x):
    return signal.sosfilt(signal.butter(12, 15700, fs=SR, output="sos"), x)


def record(dry):
    # pitch in Hz, width in Hz, change in dB.
    housing_cuts = [(3780, 250, -3.5), (5700, 420, -14), (6900, 200, -13), (15030, 400, -12),
                    (1000, 80, -5), (430, 50, -6)]
    x = np.tanh(bells(dry, housing_cuts) / 1.3) * 1.3
    x = starve(x)
    x = signal.sosfilt(signal.cheby2(12, 40, 15870, fs=SR, output="sos"), x)
    return roll_off(x)


dry = scene()
out = record(dry)
dump_mix(out)
```